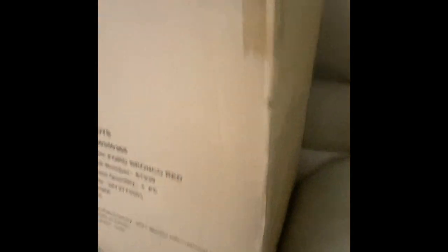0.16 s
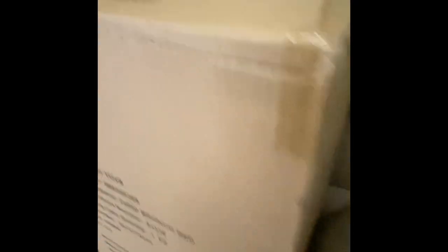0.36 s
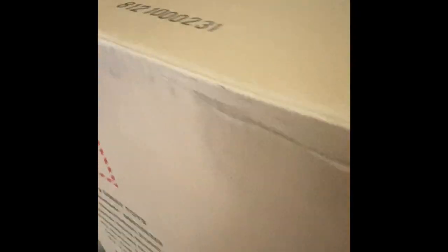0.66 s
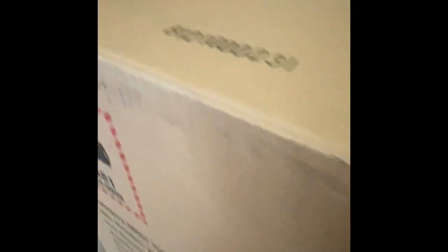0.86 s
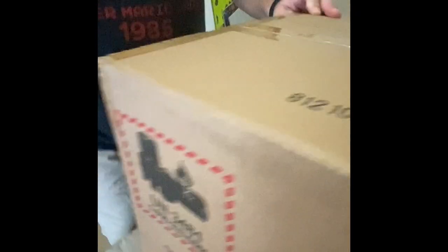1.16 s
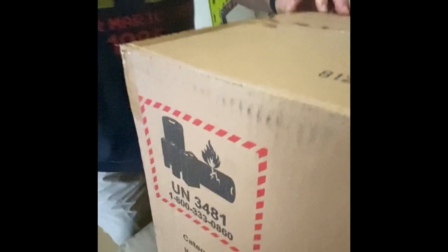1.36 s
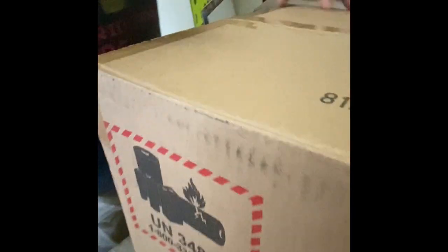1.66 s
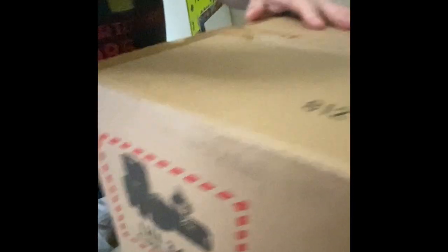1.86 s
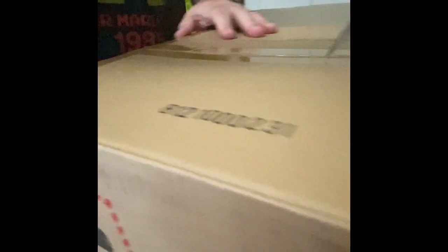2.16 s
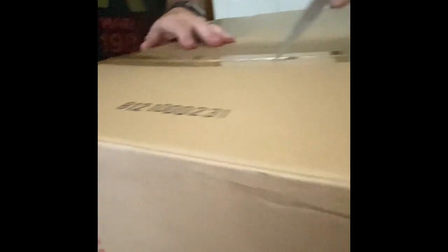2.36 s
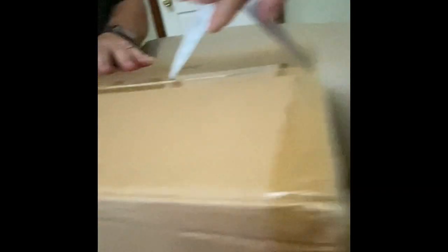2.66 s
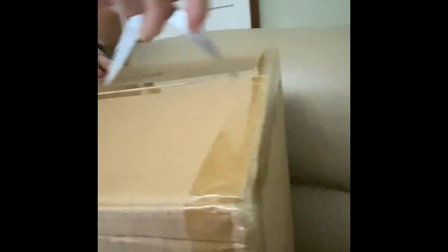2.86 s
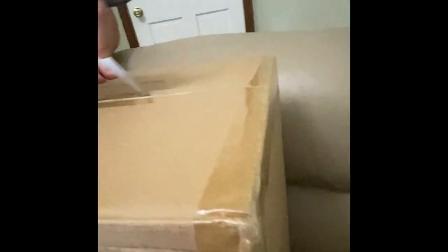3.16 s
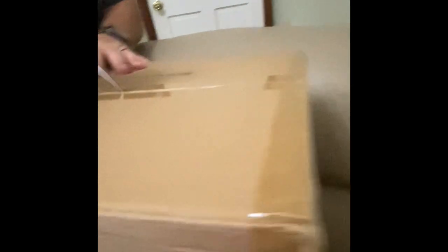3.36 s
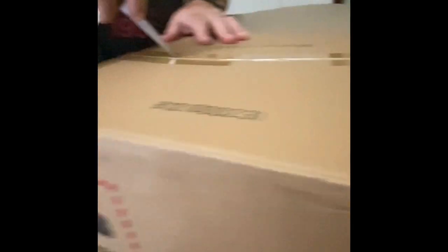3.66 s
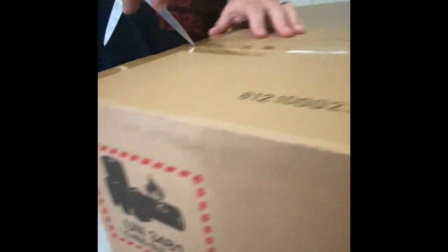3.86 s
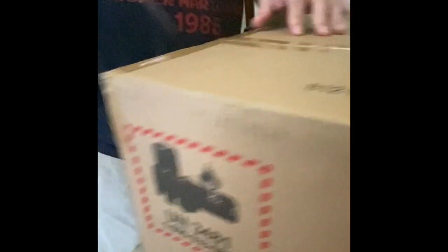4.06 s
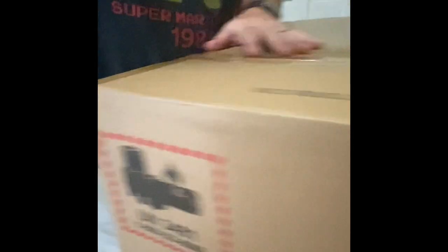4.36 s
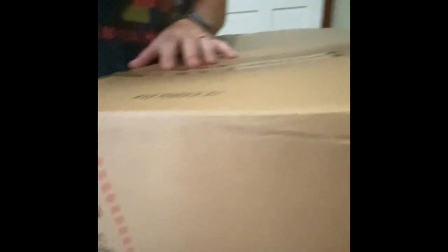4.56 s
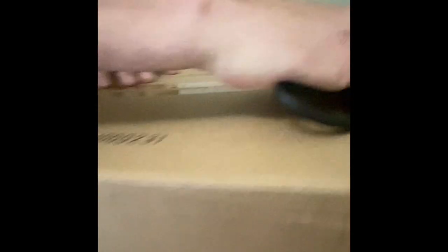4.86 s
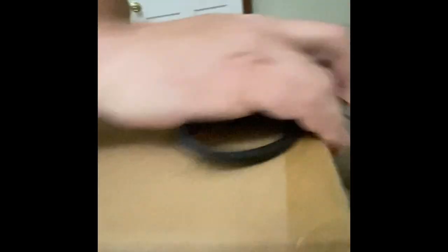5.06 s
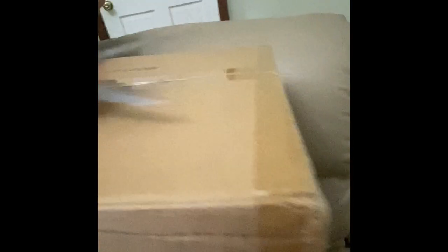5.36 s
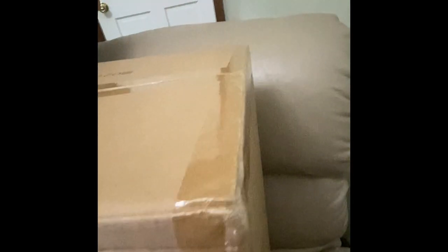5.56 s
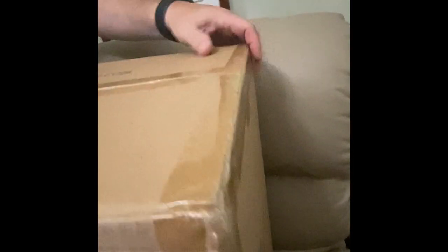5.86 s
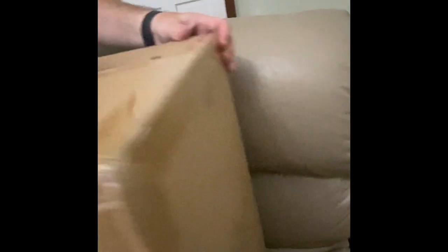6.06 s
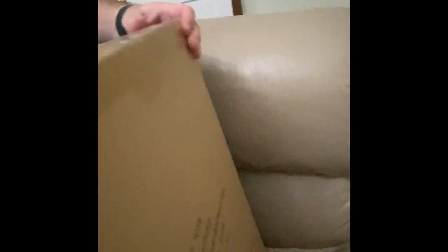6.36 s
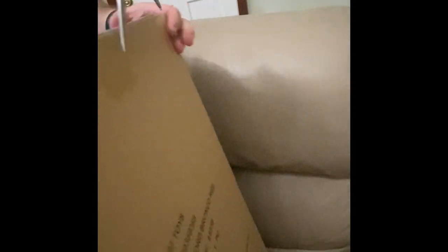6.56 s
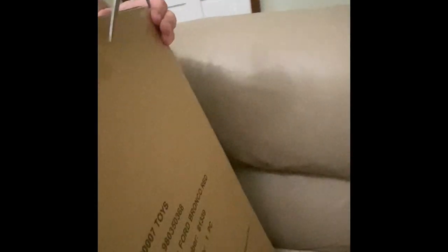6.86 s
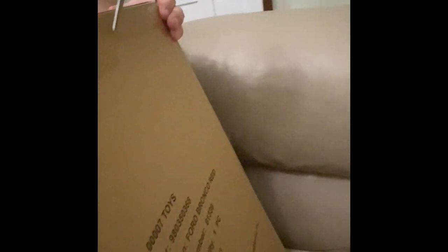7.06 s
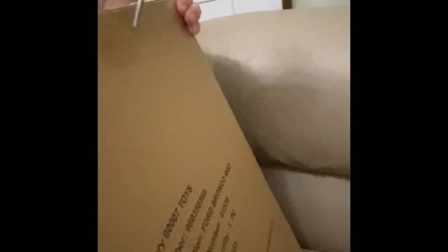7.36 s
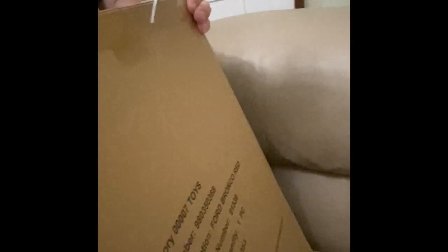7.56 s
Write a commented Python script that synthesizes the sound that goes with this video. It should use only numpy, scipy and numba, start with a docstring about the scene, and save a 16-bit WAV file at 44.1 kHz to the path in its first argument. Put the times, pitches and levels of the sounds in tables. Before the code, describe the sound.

A big cardboard box is shoved, knocked and slit along its tape on a sofa, with rough scraping, dry ticks and hollow thumps.

```python
"""Under everything lie a room's dull air and a wavering 120 Hz hum, each filtered noise.
A big cardboard box on a sofa is first shoved and slit along its tape: ringing knocks, filtered-burst ticks.
Near 3 s comes a long drag: random fibre clicks excite rasp, walls and enclosed air; finer grit hisses under palms.
From 5 s strokes and a narrow scrape that rises, then glides down, lead to more knocks and a faint rustle.
A short echo follows each sound, heard through the two microphone ports of a phone close by."""
import sys
import numpy as np
from scipy import signal
from scipy.fft import rfft, irfft
from scipy.io import wavfile
from scipy.ndimage import uniform_filter1d, minimum_filter1d
from numba import njit

SR = 44100
rng = np.random.default_rng(int(sys.argv[2]) if len(sys.argv) > 2 else 0)


def dump(signal):
    """Clip the signal to [-1, 1] and save it as 16-bit WAV at the path in sys.argv[1]."""
    limited = np.clip(np.atleast_2d(signal).T, -1, 1)
    pcm = np.round(limited * 32767).astype(np.int16)
    wavfile.write(sys.argv[1], SR, pcm)


N = 340011  # samples

# Box and blade dragged: full at t/s, rise per 20 dB/s, hold/s, fall per 20 dB/s, rasp level before its trim/dB,
# rasp swell/dB, rasp tilt/dB per octave, panel drone level/dB, drone swell/dB, inside air level/dB
DRAG_MOVES = [(0.048, 0.054, 0.09, 0.09, -46.5, -1.5, 0, -44.5, -7.5, -41),
              (0.471, 0.02, 0.062, 0.061, -45.5, 8, 1, -49, 6.5, -35),
              (0.696, 0.063, 0.093, 0.48, -37.5, -5, 0.5, -45.5, 0, -35.5),
              (0.919, 0.021, 0.13, 0.046, -39, 3, 1.5, -48.5, 10, -36),
              (1.794, 0.2, 0.028, 0.2, -61.5, 4, 0.5, -63.5, 11.5, -50),
              (2.036, 0.054, 0.074, 0.05, -60.5, -8.5, -3, -48.5, -7.5, -67),
              (2.221, 0.017, 0.0098, 0.12, -79, -3, -17, -44.5, -9, -48.5),
              (2.516, 0.0063, 0.061, 0.1, -65.5, 9.5, -1, -56, 13.5, -42),
              (2.748, 0.012, 0.075, 0.042, -51.5, 2.5, -2, -63, 12.5, -71),
              (2.827, 0.029, 0.42, 0.043, -43, 0, 0.5, -52.5, 5.5, -46),
              (3.291, 0.12, 0.54, 0.14, -45.5, 1, -3.5, -51.5, 3.5, -48),
              (4.157, 0.0072, 0.059, 0.075, -56, 3.5, -6.5, -42, -4, -39.5),
              (4.29, 0.24, 0.21, 0.075, -57.5, -6, -2, -66, 14, -57.5),
              (4.705, 0.064, 0.016, 0.19, -50, -2, -3, -54, 2.5, -37),
              (5.11, 0.15, 0.082, 0.11, -51.5, 0.5, 2, -54.5, -2.5, -50),
              (5.395, 0.052, 0.073, 0.24, -57, 4, -2.5, -60.5, 9, -51),
              (5.595, 0.0076, 0.011, 0.18, -46.5, -12, -10, -53, 1.5, -65),
              (5.703, 0.0083, 0.14, 0.048, -50, -3, -1.5, -47, -7.5, -45.5),
              (5.881, 0.016, 0.038, 0.043, -42.5, -8, 2, -39.5, -0.5, -59),
              (5.951, 0.022, 0.011, 0.13, -40.5, 3, 6, -39.5, 2.5, -58),
              (6.022, 0.033, 0.039, 0.081, -42, -1.5, 8.5, -43, -4.5, -54),
              (6.236, 0.0092, 0.038, 0.1, -51.5, -8, 3, -52.5, 0.5, -55),
              (6.378, 0.12, 0.11, 0.17, -60.5, -9, 0, -58.5, -2, -52),
              (6.593, 0.025, 0.011, 0.15, -62, -0.5, -3.5, -51.5, -16, -57),
              (7.119, 0.023, 0.0081, 0.12, -63, -6, 2, -50, -6, -68)]
# Faint rustle of the held box between moves: t/s, rasp level before its trim/dB, panel drone level/dB,
# inside air level/dB, high hiss level/dB
HELD_RUSTLE = [(0, -65, -72, -53.5, -68), (.29, -82, -73.5, -81, -94), (.44, -63, -56.5, -60, -86),
               (.63, -54.5, -62.5, -57, -70), (1.1, -55, -54.5, -59.5, -72.5), (1.58, -82, -70, -68, -78.5),
               (1.99, -63.5, -61, -55, -76), (2.18, -69, -68, -63.5, -83), (2.5, -79, -66.5, -59, -102),
               (2.72, -69.5, -61, -67, -82), (4.05, -64.5, -59, -52.5, -70), (4.6, -75, -62, -59, -79),
               (4.9, -57.5, -59, -64, -77), (5.34, -82, -68, -59, -69), (6.14, -68, -68.5, -56, -74),
               (6.5, -65.5, -60.5, -65, -72), (6.95, -77.5, -66.5, -57, -86.5),
               (7.25, -83.5, -74.5, -56, -92.5), (7.7, -75, -69.5, -61, -92)]


def undb(db):
    """Amplitude ratio from the logarithmic level."""
    return 10 ** (np.asarray(db) / 20)


def unit(x):
    """Normalise to unit root-mean-square amplitude."""
    return x / np.sqrt(np.mean(x ** 2))


def along(table):
    """Linear interpolation in time: the columns of a curve table, one value a sample."""
    s, *columns = np.transpose(table)
    return [np.interp(np.arange(N) / SR, s, c) for c in columns]


def over_hz(table):
    """Interpolation on a logarithmic frequency axis, one value a spectral line."""
    hz, value = np.transpose(table)
    line_hz = np.arange(N // 2 + 1) * SR / N
    return np.interp(np.log(line_hz + 1), np.log(hz + 1), value)


def colour(x, table):
    """Linear filtering: weight the spectrum by a gain curve, then normalise."""
    return unit(irfft(rfft(x) * undb(over_hz(table)), N))


def walk(rate):
    """Slow random modulation: a new level every 1 / rate s, joined by ramps, with unit RMS."""
    k = int(SR / rate)
    steps = np.repeat(rng.standard_normal(N // k + 1), k)[:N]
    return unit(uniform_filter1d(steps, k))


def fibres(rate, scatter_db, slip_rate, slip_db):
    """Stick-slip friction: random clicks (rate a second) of uneven size and jerking strength."""
    on = rng.random(N) < rate / SR
    excess_db = scatter_db * np.minimum(rng.exponential(size=N), 4)
    size = undb(excess_db) * rng.standard_normal(N)
    return on * size * undb(slip_db * walk(slip_rate))


def ring(x, hz, t60):
    """Modal resonance: a two-pole oscillator whose response decays 60 dB in t60 seconds."""
    r = np.exp(-np.log(1000) / (t60 * SR))
    w = 2 * np.pi * hz / SR
    return signal.lfilter([0, r * np.sin(w)], [1, -2 * r * np.cos(w), r * r], x)


@njit
def sweep(x, turn, k):
    """State-variable resonance: band-pass with moving tuning tan(pi f / SR) and relative width k."""
    y, band, low = np.empty(len(x)), 0., 0.
    for i in range(len(x)):
        g = turn[i]
        v = (band + g * (x[i] - low)) / (1 + g * (g + k[i]))
        band = 2 * v - band
        low = low + 2 * g * v
        y[i] = k[i] * v
    return y


def resonance(x, hz, width_hz):
    """Cascaded resonance: two band-passes, each width_hz wide, give steeper skirts."""
    turn, k = np.tan(np.pi * hz / SR), width_hz / hz
    return unit(sweep(sweep(x, turn, k), turn, k))


def moves(table, db, swell_db, rest_db, lag_s=0):
    """Exponential rise and decay: moves swell while held; moves and rustle add in power."""
    s, rise, hold, fall = np.maximum(np.transpose(table)[:4, :, None], .001)
    t = np.arange(0, N / SR + .001, .001)
    since = t - s - lag_s
    rise_db = 20 * np.minimum(since, 0) / rise
    fall_db = 20 * np.maximum(since - hold, 0) / fall
    swell = swell_db[:, None] * np.clip(since / hold, 0, 1)
    level_db = db[:, None] + swell + (rise_db - fall_db)
    power = np.interp(np.arange(N) / SR, t, np.sum(undb(level_db) ** 2, axis=0))
    return np.sqrt(power + undb(rest_db) ** 2)


def patchy(x, edges_hz, rate, depth_db):
    """Independent band modulation: each band swells and fades alone, so the colour shifts."""
    lines = rfft(x)
    band = np.searchsorted(edges_hz, np.arange(len(lines)) * SR / N)
    total = 0
    for k in range(len(edges_hz) + 1):
        total = total + irfft(lines * (band == k), N) * undb(depth_db * walk(rate))
    return unit(total)


def shuffle_phase(x, size=128):
    """Decorrelation by random phase: each short-time spectral bin is shuffled, total power kept."""
    frames = signal.stft(x, nperseg=size)[2]
    turned = frames * np.exp(2j * np.pi * rng.random(frames.shape))
    shuffled = signal.istft(turned, nperseg=size)[1][:N]
    return shuffled * np.sqrt(np.mean(x ** 2) / np.mean(shuffled ** 2))


def room():
    """Filtered noise: dull air whose level drifts, and a narrow resonance whose hum wavers."""
    # spectrum of the air: f/Hz, relative gain/dB
    air_spectrum = [(25, -10), (43, -10), (84, -12.5), (123, 26.5), (180, -50), (212, -17), (531, -31.5),
                    (607, 1.5), (714, -23), (16000, -99)]
    air = colour(rng.standard_normal(N), air_spectrum) * undb(2.9 * walk(2.0))
    hum = unit(ring(rng.standard_normal(N), hz=120.1, t60=4.3 / 8.2))
    return undb(-62) * air + undb(-59.5) * hum


def glide():
    """Resonant filtering of friction noise: fine grit heard through one moving resonance."""
    # narrow scrape as hand and scissors slide over the lid: t/s, f/Hz, level/dB
    scrape = [(5.12, 1350, -97), (5.15, 1400, -59), (5.2, 1470, -60), (5.3, 1700, -70), (5.41, 1290, -60),
              (5.49, 1010, -61), (5.52, 950, -95)]
    hz, db = along(scrape)
    return undb(db) * resonance(fibres(8000, 1.8, 120, 2.5), hz, width_hz=290)


def slide():
    """Fine friction under skin and tape: almost smooth noise in two bands that flicker partly together."""
    # palms and tape: full at t/s, rise per 20 dB/s, hold/s, fall per 20 dB/s,
    # high hiss level/dB, its swell/dB, low hiss level/dB
    strokes = [(0.034, 0.027, 0.11, 0.096, -58, -4.5, -51.5), (0.462, 0.0066, 0.063, 0.083, -55, 4.5, -46),
               (0.702, 0.066, 0.1, 0.084, -44.5, -2.5, -45), (0.947, 0.1, 0.081, 0.11, -47.5, -4, -43.5),
               (1.606, 0.0095, 0.2, 0.02, -48.5, 5, -55), (1.911, 0.034, 0.0069, 0.03, -53, 2.5, -54.5),
               (2.016, 0.0073, 0.022, 0.035, -57.5, 6, -58.5), (2.522, 0.01, 0.054, 0.11, -67, -8, -59),
               (2.84, 0.083, 0.35, 0.68, -50.5, -1.5, -48.5), (3.577, 0.037, 0.35, 0.036, -48.5, -5.5, -48),
               (4.039, 0.092, 0.0037, 0.024, -47, -6, -57),
               (4.117, 0.031, 0.048, 0.039, -39.5, -1.5, -47.5), (4.179, .02, 0.13, 0.018, -58.5, 4, -64),
               (4.386, 0.012, 0.14, 0.017, -54, -7.5, -60), (4.65, 0.046, 0.062, 0.062, -52.5, 2.5, -55.5),
               (4.781, 0.12, 0.18, 0.085, -59.5, 4.5, -62), (5.098, 0.086, 0.013, 0.16, -43, -7, -46.5),
               (5.239, 0.092, 0.16, 0.1, -37.5, -6, -44.5), (5.619, 0.031, .01, 0.055, -50, -1, -54),
               (5.718, 0.0073, 0.23, 0.12, -37, -19, -42.5), (6.055, 0.11, 0.0042, 0.053, -40.5, -7.5, -41),
               (6.1, .05, 0.27, 0.13, -61.5, 1, -61.5), (7.113, 0.077, 0.0045, 0.081, -70, 1, -60)]
    # hiss spectra: f/Hz, relative gain/dB
    high_spectrum = [(5500, -22.5), (7200, 4), (8500, 2), (10500, 0), (13000, 1), (15500, -2.5),
                     (17000, -33)]
    low_spectrum = [(800, -22.5), (2500, -11.5), (3800, -10), (5500, -5), (6800, -6), (8500, -35)]
    high_db, swell, low_db = np.transpose(strokes)[4:]
    rest = along(HELD_RUSTLE)[-1]
    grip = walk(60)
    high = colour(fibres(16000, 0.67, 300, 1.5) * undb(2.0 * grip), high_spectrum)
    low = colour(fibres(12000, 0.55, 200, 0.88) * undb(0.5 * grip), low_spectrum)
    low = patchy(low, [4400, 5600], rate=16, depth_db=1.7)
    high_gain = moves(strokes, high_db, swell, rest)
    low_gain = moves(strokes, low_db, 0.75 * swell, rest + 5.5)  # the low band swells less
    return high_gain * high + low_gain * low


def crackles(count=90, over_rasp_db=7, scatter_db=2.5, centre_hz=2130, octaves=1):
    """Random fracture of fibres: chance tick rows whose levels follow the least rasp gain nearby."""
    when, size, tone = rng.random((count, 3)).T
    rasp_db, swell = np.transpose(DRAG_MOVES)[4:6]
    gain = moves(DRAG_MOVES, rasp_db, swell, -94)
    floor = minimum_filter1d(gain, size=SR // 20)  # least within 50 ms
    rasp = floor[(when * (N - 1)).astype(int)]
    db = 20 * np.log10(rasp) + over_rasp_db - scatter_db * np.log(size + 0.1)
    hz = centre_hz * 2 ** (octaves * (2 * tone - 1))
    return list(zip(when * (N - 1) / SR, db, hz))


def ticks(crack_s=0.00009, cycles=5, tail_db=-9):
    """Impulsive broadband excitation: a crack and a noise tail that lasts longer for low centres."""
    # tape, blade and creasing card: t/s, peak level/dB, centre f/Hz
    snaps = [(0.0291, -31, 3550), (0.1095, -27, 3940), (0.448, -47, 3000), (0.4715, -20, 1750),
             (0.515, -37, 1760), (0.675, -25.5, 1880), (0.701, -31, 1800), (0.798, -27, 2000),
             (0.871, -23, 1730), (0.9068, -25, 1700), (0.95, -22, 2100), (0.998, -22, 2000),
             (1.0425, -18.5, 1870), (1.0612, -19.5, 2080), (1.4167, -56, 2380), (1.4711, -43.5, 3850),
             (2.011, -43.5, 5730), (2.518, -39, 1880), (2.5336, -30.5, 6500), (2.6424, -41, 1830),
             (2.6528, -39.5, 1940), (2.7365, -47, 1620), (3.3905, -25.5, 1840), (3.396, -37, 2480),
             (3.6045, -19, 6100), (3.637, -27, 11000), (3.65, -28, 3650), (3.925, -33, 9500),
             (4.0736, -28, 10260), (4.4388, -35, 9600), (4.7568, -32.5, 1470), (5.1178, -27, 3990),
             (5.149, -27, 2900), (5.4247, -25, 11800), (5.5959, -31.5, 2970), (5.887, -17.5, 1910),
             (6.0412, -19, 2510), (6.2305, -41, 1910), (6.395, -38, 2610), (6.462, -51, 1900),
             (6.5225, -46, 6000), (6.793, -47, 2140), (7.0428, -37.5, 5260), (7.101, -38.5, 4450),
             (7.114, -33.5, 2360), (7.1277, -29, 8300)]
    out, span, rows = np.zeros(N + SR), 2048, snaps + crackles()
    t = np.arange(span) / SR
    for (s, db, hz), z in zip(rows, rng.standard_normal((len(rows), span))):
        crack = np.exp(-t / crack_s) * np.cos(2 * np.pi * hz * t)
        burst = crack + z * undb(tail_db) * np.exp(-t * hz / cycles)
        hump_hz = [hz / 1.2, min(hz * 1.2, .45 * SR)]
        skirt_hz = [hz / 0.83, min(hz * 5.0, .45 * SR)]
        hump = signal.lfilter(*signal.butter(1, hump_hz, "band", fs=SR), burst)
        skirt = signal.lfilter(*signal.butter(1, skirt_hz, "band", fs=SR), burst)
        tick = hump + undb(-6.5) * skirt
        start = int(s * SR)
        out[start:start + span] += undb(db) * tick / np.abs(tick).max()
    return out[:N]


def knocks(push_s=0.001155, wait_s=0.003):
    """Modal excitation: a short push rings hollow, panels and stiff edges in separate shares."""
    # blows: t/s, level/dB, panel share/dB, edge brightness share/dB, damping factor/1
    blows = [(0.038, -28, -15, -8, 1.7), (1.067, -16, -19.5, -17, 1.5), (1.82, -35.5, -14, -5.5, 1.04),
             (2.024, -34.5, -5, -9, 0.49), (2.213, -30, 0.5, -20, 3.7), (2.532, -36.5, 1, -5, 0.35),
             (2.562, -31.5, -18, -20, 0.88), (2.649, -36.5, -14, -19, 0.21), (4.179, -31, -13, -11, 1.8),
             (4.616, -34, -26, -29, 0.32), (4.711, -22.5, -19, -19, 1.4), (4.732, -22.5, -28, -27, 1.3),
             (5.598, -30, 0, -1, 1.9), (5.7, -25.5, -29, -9.5, 0.85), (5.882, -17.5, -2.5, -8.5, 0.55),
             (6.226, -41, -4, -8.5, 0.82), (7.112, -42, -22, 0, 1.1)]
    # modes of the box at damping 1: mean f/Hz, level relative to its part/dB, decay t60/s
    modes = [(60.6, -3.5, 0.12), (96.8, 1.5, 0.15), (166, 6.5, 0.031), (348, -8, 0.026), (394, 0, 0.017),
             (707, -7, 0.018), (980, -13, 0.011), (1650, -9, 0.045), (2120, -10, 0.017), (2640, 6, 0.031)]
    out, span = np.zeros(N + SR), SR // 3
    push = np.zeros(span)
    width = int(push_s * SR) + 2
    start = int(wait_s * SR)  # a fixed 3 ms wait before each push starts
    push[start:start + width] = np.hanning(width)
    spot = rng.standard_normal((len(blows), len(modes)))
    for (s, db, panel_db, bright_db, damp), z in zip(blows, spot):
        parts = np.zeros((3, span))
        for (hz, mode_db, t60), shift in zip(modes, z):
            part = np.searchsorted([250, 600], hz)  # Hz: hollow, panels, edges
            force = np.diff(push, prepend=0) if part == 2 else push
            mode = ring(force, hz * (1 + 0.059 * shift), t60 / max(damp, .2))
            parts[part] += undb(mode_db) * mode
        parts /= np.abs(parts).max(axis=1, keepdims=True)
        share_db = np.array([-2.5, panel_db, bright_db])
        at = int(s * SR)
        out[at:at + span] += undb(db + share_db) @ parts
    return out[:N]


def drag():
    """Stick-slip coupling: the same jerks of the contact rasp in the paper and shake the walls."""
    # rasp resonances of the card: mean f/Hz, width of each filter pass/Hz, mean relative level/dB
    rasp_bands = [(773, 333, -2.5), (932, 460, -3.5), (1155, 330, -5.5), (1656, 390, -1.5), (2024, 710, 0),
                  (2494, 610, -7), (3300, 610, -11.5)]
    # spectra of inside air, walls and panels: f/Hz, relative gain/dB
    boom_spectrum = [(30, -42), (45, 6), (55, 0.5), (75, 0.5), (100, -12.5), (130, -62.5)]
    wall_spectrum = [(65, -1), (92, 4), (120, 6.5), (160, 8), (200, 0.5), (260, -46)]
    drone_spectrum = [(185, 0.5), (250, 1.5), (340, 3), (420, 0.5), (580, -6), (760, -25.5)]
    rasp_db, rasp_swell, tilt_db, drone_db, drone_swell, air_db = np.transpose(DRAG_MOVES)[4:]
    rest_rasp, rest_drone, rest_air, _ = along(HELD_RUSTLE)
    panel = moves(DRAG_MOVES, drone_db, drone_swell, rest_drone)
    air = moves(DRAG_MOVES, air_db, 0 * air_db, rest_air, lag_s=0.018)
    sides = np.hypot(undb(-6) * air, undb(1.5) * panel)  # walls follow both air and panels
    jerks = walk(70)
    grit = fibres(5000, 3.5, 250, 1.3) * undb(0.59 * jerks)
    # each resonance of the card drifts, swells and fades alone as the contact wanders
    rasp = 0
    for hz, width, db in rasp_bands:
        band = resonance(grit, hz * undb(0.45 * walk(9)), width)
        octaves = np.log2(hz / 1400)
        press = moves(DRAG_MOVES, rasp_db + tilt_db * octaves, rasp_swell, rest_rasp)
        rasp = rasp + band * press * undb(db + 1.1 * walk(24))
    boom = colour(fibres(900, 1.4, 30, 1.8) * undb(1.0 * jerks), boom_spectrum)
    walls = colour(fibres(1200, 1.8, 30, 1.2) * undb(1.3 * jerks), wall_spectrum)
    drone = colour(fibres(2500, 1.5, 40, 1.6) * undb(1.8 * jerks), drone_spectrum)
    return undb(-7.5) * rasp + air * boom + sides * walls + panel * drone


def echo(near, t60_s=0.065, level_db=-14.5, top_hz=5000):
    """Reverberation: convolution with decaying low-passed noise, the short dull answer of a furnished room."""
    t = np.arange(SR // 2) / SR
    noise = signal.lfilter(*signal.butter(1, top_hz, fs=SR), rng.standard_normal(len(t)))
    tail = noise * undb(-60 * t / t60_s)
    tail *= np.clip(t / 0.0012 - 1, 0, 1)  # silent for 1.2 ms, then fades in
    tail /= np.sqrt(np.sum(tail ** 2))
    return undb(level_db) * signal.fftconvolve(near, tail)[:N]


def ports(heard):
    """Stereo cues: phase lead, level difference and partial coherence between two ports."""
    # left port's lead: f/Hz, phase/rad
    lead = [(0, 0.03), (1980, 0), (4050, 1.2), (4390, 1.56), (5250, 0.8), (5770, 1.17), (6550, 2.44),
            (9470, 5.19), (10900, 6.28), (13200, 9.35), (14300, 8.2), (15200, 11.1), (16500, 12.4)]
    # left minus right: f/Hz, level/dB
    lean = [(60, -0.66), (400, -1.7), (1000, 0.35), (3000, -1.6), (8000, -0.37)]
    # likeness of the ports: f/Hz, likeness/1 (0 to 1)
    likeness = [(30, 1), (350, 0.94), (650, 0.61), (1000, 0.94), (1600, 1), (2800, 0.35), (3600, 0.56),
                (5500, 0.8), (7200, 1), (16000, 0.96)]
    alike = np.clip(over_hz(likeness), 0, 1)
    lines = rfft(heard)
    same = lines * np.sqrt((1 + alike) / 2)
    # the differing part is the same sound with its short-time phases shuffled at random
    other = rfft(shuffle_phase(irfft(lines * np.sqrt((1 - alike) / 2), N)), N)
    turn = np.exp(.5j * over_hz(lead)) * undb(over_hz(lean) / 2)
    return np.array([irfft((same + other) * turn, N), irfft((same - other) / turn, N)])


def scene():
    """Superposition: the box sounds, their echo and the room add before reaching both ports."""
    near = drag() + slide() + glide() + knocks() + ticks()
    return ports(near + echo(near) + room())


def record(dry):
    """Band limiting: the phone drops the deepest bass and cuts the top."""
    bass_cut = signal.butter(3, 42, "high", fs=SR, output="sos")
    top_cut = signal.ellip(10, .2, 70, 15750, fs=SR, output="sos")
    thin = signal.sosfilt(bass_cut, dry)
    return signal.sosfilt(top_cut, thin)


dry = scene()
out = record(dry)
dump(out)
```